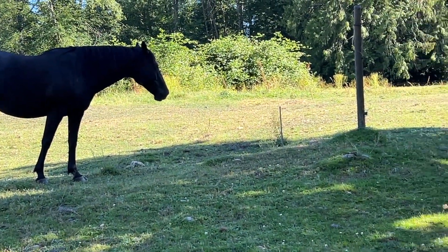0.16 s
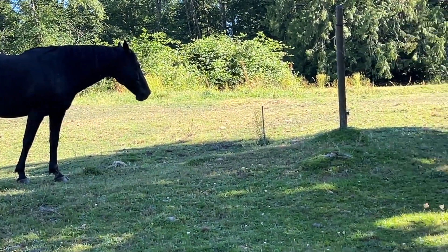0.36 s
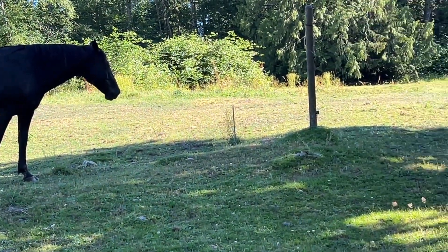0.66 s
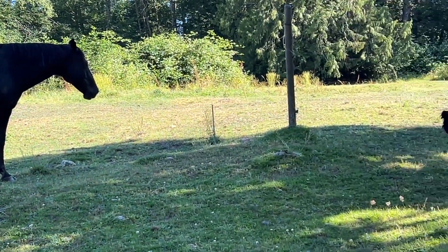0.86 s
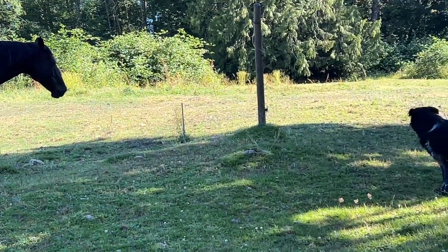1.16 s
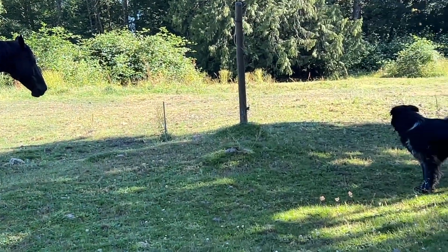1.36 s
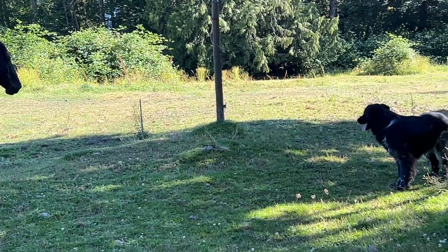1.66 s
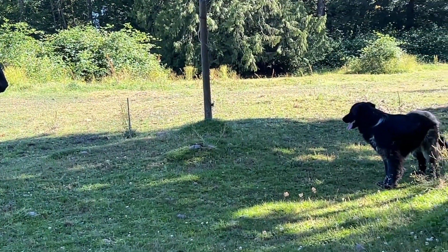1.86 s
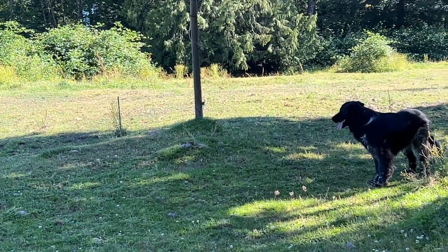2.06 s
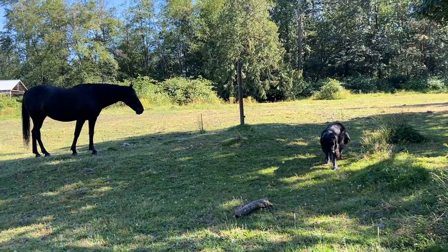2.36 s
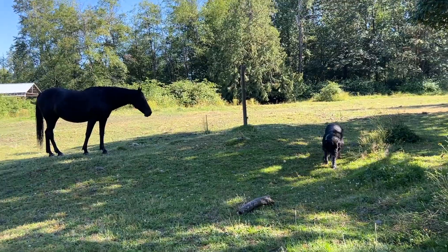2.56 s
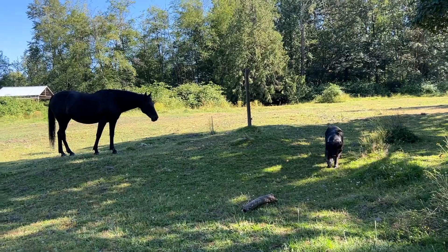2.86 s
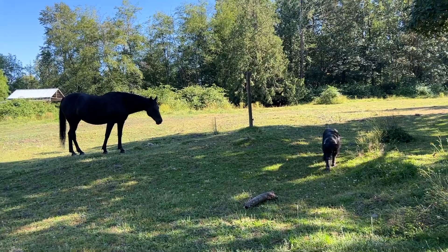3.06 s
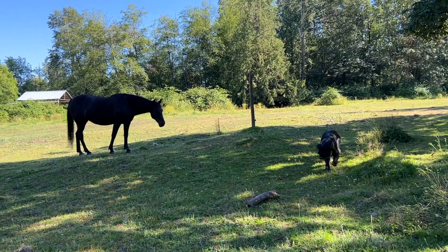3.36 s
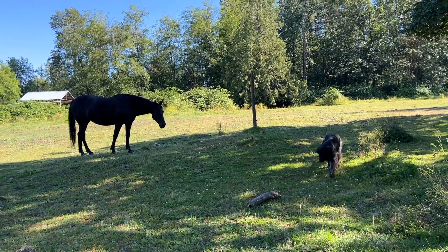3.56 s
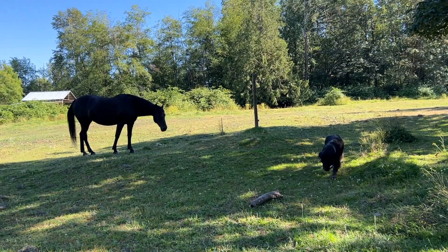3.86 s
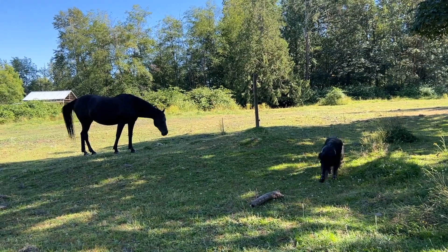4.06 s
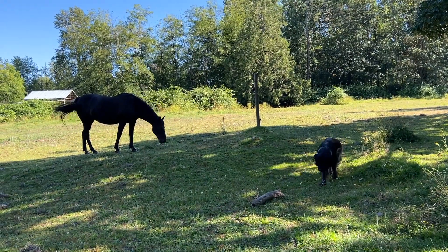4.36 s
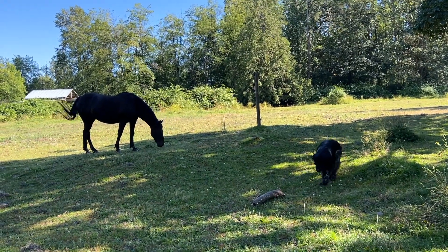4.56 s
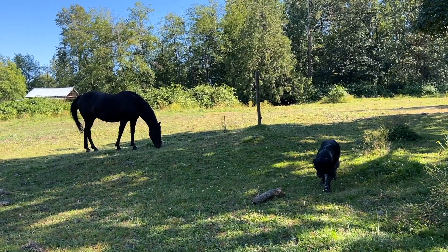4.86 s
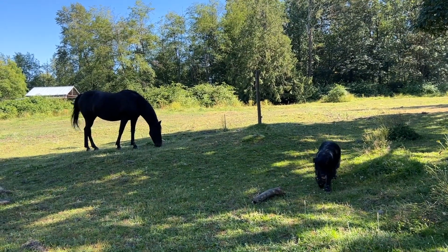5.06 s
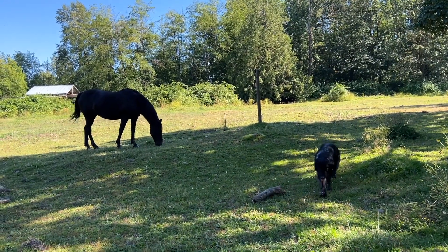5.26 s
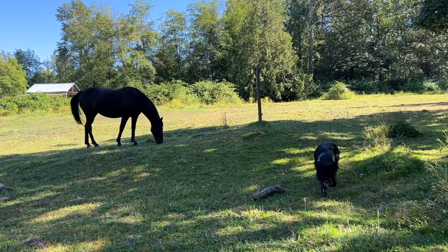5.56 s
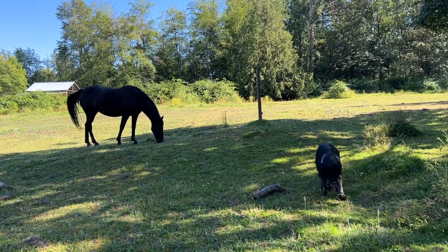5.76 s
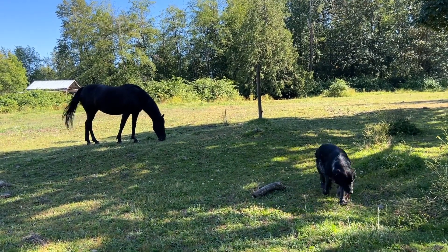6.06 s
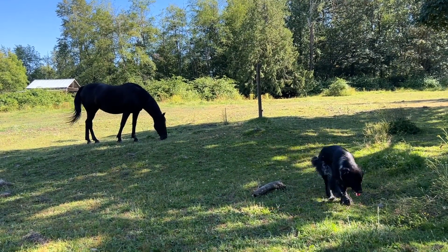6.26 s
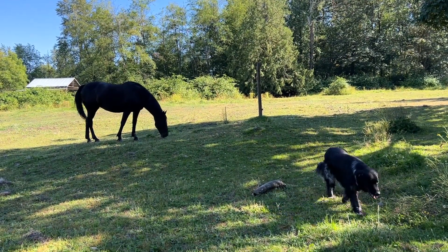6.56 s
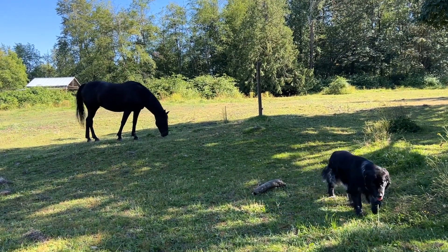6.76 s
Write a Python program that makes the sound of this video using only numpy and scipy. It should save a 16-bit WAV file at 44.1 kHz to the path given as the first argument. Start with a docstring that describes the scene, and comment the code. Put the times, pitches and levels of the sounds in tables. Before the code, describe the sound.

A horse gives one loud, fluttering snort after a stretch of low outdoor rumble, faint birds and one closer buzzy bird call.

```python
"""A summer pasture. Far traffic rumbles and leaves rustle, both as broadband noise. Birds call in
the tree line, which scatters their notes; a near one buzzes by modulating pitch and loudness together.
A dog's paws swish in the grass, among a few low thuds, a dry click and faint ticks.
At the end a horse blows through its nostrils, which flap open and shut about 24 times a second:
a fluttering valve that thumps and chops the air stream into whistle, breath and hiss."""
import sys
import numpy as np
from scipy import signal
from scipy.fft import rfft, irfft, next_fast_len
from scipy.io import wavfile
from scipy.ndimage import uniform_filter1d, map_coordinates

SR = 44100
rng = np.random.default_rng(int(sys.argv[2]) if len(sys.argv) > 2 else 0)


def output_pcm(signal):
    """Save a mono or channel-first signal as 16-bit PCM at the path in sys.argv[1].

    Samples are clipped to [-1, 1] before scaling.
    """
    pcm = np.clip(np.atleast_2d(signal).T, -1, 1) * 32767
    wavfile.write(sys.argv[1], SR, np.round(pcm).astype(np.int16))


N = 303849
CLICK_S = 2.3255

# Stereo coherence of the ambient noise: (frequency [Hz], left-right likeness [ratio])
AMBIENT_COHERENCE = [(60, 0.97), (180, 0.91), (550, 0.42), (1650, 0.3), (4970, 0.16), (8500, 0.2),
                     (9600, -0.96), (10600, -1.08), (11500, 0.14), (12700, 0.76), (14400, 0.88),
                     (15300, 0.11)]


def amp(db):
    """Decibels to amplitude ratio."""
    return 10 ** (np.asarray(db) / 20)


def unit(x):
    """Normalisation to an rms of 1."""
    return x / np.sqrt(np.mean(x ** 2) + 1e-20)


def along(points, hz):
    """Interpolation of (frequency [Hz], value) points on a log axis."""
    f, v = np.transpose(points)
    return np.interp(np.log(hz + 1), np.log(f + 1), v)


def passband(points):
    """Band-pass response through (frequency [Hz], gain [dB]) points, zero outside them."""
    return lambda hz: amp(along(points, hz)) * (hz > points[0][0]) * (hz < points[-1][0])


def curves(rows, at=None):
    """Linear envelopes, one for each column after the first."""
    s, *cols = np.transpose(rows)
    return [np.interp(np.arange(N) / SR if at is None else at, s, c) for c in cols]


def ramp(start_s, length_s):
    """Linear rise from 0 to 1."""
    return np.clip((np.arange(N) / SR - start_s) / length_s, 0, 1)


def wobble(rate, count=N):
    """Smooth random modulation with rate knots a second."""
    knots = rng.standard_normal(count // 16 + 4)[:int(count * rate / SR) + 4]
    return map_coordinates(knots, [np.arange(count) * rate / SR], order=2)


def phase(hz):
    """Phase in radians, the integral of frequency."""
    return 2 * np.pi * np.cumsum(hz) / SR


def hoarse(hz, width_hz):
    """Narrow-band noise: random quadrature modulation of a moving pitch."""
    angle = phase(hz)
    return wobble(width_hz, len(hz)) * np.cos(angle) + wobble(width_hz, len(hz)) * np.sin(angle)


def filtered(x, response):
    """Linear filtering by a complex frequency response."""
    m = next_fast_len(N + 8192, real=True)
    return irfft(rfft(x, m) * response(np.fft.rfftfreq(m, 1 / SR)), m)[..., :N]


def rush(gain, coherence, patchy_db):
    """Partly coherent stereo noise of rms 1, patchy in time and frequency."""
    spectra = signal.stft(rng.standard_normal((2, N)), nperseg=512)[2]
    patches = uniform_filter1d(uniform_filter1d(rng.standard_normal(spectra.shape[1:]), 6, 0), 14, 1)
    pair = signal.istft(spectra * amp(patchy_db * unit(patches)), nperseg=512)[1][:, :N]
    angle = lambda hz: np.arccos(np.clip(along(coherence, hz), -1, 1)) / 2
    mid, side = filtered(pair, lambda hz: gain(hz) * [np.cos(angle(hz)), np.sin(angle(hz))])
    return unit(np.array([mid + side, mid - side]))


def add(out, s, x):
    """Superposition of x on out from time s."""
    i = round(s * SR)
    x = x[..., max(-i, 0):max(N - i, 0)]
    out[..., max(i, 0):max(i, 0) + x.shape[-1]] += x


def pan(db):
    """Stereo gains for a left-minus-right level difference."""
    return amp(np.array([[.5], [-.5]]) * db)


def thump(first_hz, last_hz, fall_ms, swell_ms):
    """A damped oscillation whose pitch glides exponentially."""
    t = np.arange(SR // 5) / SR
    fall, age = fall_ms / 1000, t / swell_ms * 1000
    cycles = last_hz * t + (first_hz - last_hz) * fall * (1 - np.exp(-t / fall))
    return age * np.exp(1 - age) * np.sin(2 * np.pi * cycles)


def trees(x, t60, delay):
    """Scattering from the tree line: a diffuse decay, different on each side."""
    tail = rng.standard_normal((2, SR // 2)) * amp(-60 * np.arange(SR // 2) / SR / t60)
    delayed = np.pad(x, (int(delay * SR), 0))[None]
    return signal.oaconvolve(delayed, tail / np.linalg.norm(tail[0]), axes=1)[:, :N]


def traffic_and_leaves():
    """Amplitude-modulated noise bands: rumble, tyre roar of a far road, and leaves."""
    # Spectra: (frequency [Hz], gain [dB])
    rumble_band = [(22, -27), (40, -2), (60, 0.5), (95, -2.5), (130, -12), (170, -20), (260, -29.5)]
    road_band = [(120, 1.5), (200, -1.5), (311, -4), (468, -4.5), (640, -7.5), (930, 0), (1160, -9),
                 (1350, -8.5), (2060, -18), (3000, -22), (4000, -33.5)]
    leaf_band = [(1500, -3.5), (2500, -8), (3290, -4), (5000, -6), (7260, -10.5), (9000, -17), (11200, -18),
                 (13400, -18), (15000, -22), (15700, -29)]
    # Envelopes: (time [s], relative level [dB])
    rumble_levels = [(0, -45), (.3, -44), (.9, -42.5), (1.9, -46), (2.26, -41), (2.55, -48.5), (3.23, -47),
                     (3.7, -49), (4, -47), (4.45, -47.5), (5.35, -44.5), (5.7, -48), (6.05, -43),
                     (6.44, -47)]
    leaf_levels = [(0, -81), (1.5, -84), (2.6, -83.5), (3.3, -78), (4.4, -78), (5.4, -77), (6.44, -77.5)]
    (rumble_db,), (leaf_db,) = curves(rumble_levels), curves(leaf_levels)
    noise = lambda band, patchy_db: rush(passband(band), AMBIENT_COHERENCE, patchy_db)
    rumble = amp(rumble_db + 1.5 + 1.45 * wobble(7)) * noise(rumble_band, 1.06)
    road = amp(-54.5 + 1.11 * wobble(4.9)) * noise(road_band, 0.77)
    leaves = amp(leaf_db + 9 + 1.34 * wobble(7.3)) * noise(leaf_band, 1.95)
    return rumble + road + leaves


def far_birds():
    """Gliding notes, broadened by noise modulation and blurred by scattering."""
    # Single notes: (time [s], length [s], first pitch [Hz], last pitch [Hz], level [dB],
    # hoarseness [Hz], left minus right [dB])
    notes = [(-.05, 0.31, 4650, 4640, -72.5, 460, 5), (2.292, 0.035, 5200, 6000, -77, 200, -8),
             (2.345, .072, 7200, 6900, -80, 350, -3), (2.45, 0.22, 3280, 3330, -72, 170, -3),
             (2.755, 0.14, 6080, 6200, -77.5, 35, 9), (2.89, .2, 6170, 6010, -82, 35, 7),
             (3.221, 0.67, 6900, 6870, -82, 251, -3), (3.754, 0.074, 4030, 4130, -67, 70, 8),
             (3.755, .055, 4560, 4610, -67, 30, 7), (3.752, 0.14, 4300, 4540, -62.5, 35, 8),
             (3.85, 0.16, 4470, 4720, -70, 50, 4), (3.9, 0.32, 4500, 4530, -75.5, 149.6, 4),
             (4.12, 0.15, 1640, 1496, -64, 148.4, -2)]
    # Repeated notes: (start [s], end [s], period [s], loudest note [index], fade away from it
    # [dB per note], then the columns above from length on)
    series = [(0.274, .44, 0.013, 4.5, 1.8, 0.018, 2950, 3680, -66, 60, 3),
              (0.516, 1.3, 0.1465, 0.5, 2.8, .085, 4360, 3790, -68, 151, 0.5),
              (3.108, 3.68, .091, 4.5, .7, .024, 4040, 4470, -70, 35, 5.7)]
    repeats = [(s, length, first_hz, last_hz, db - fade_db * abs(k - loudest), *rest)
               for start, end, period, loudest, fade_db, length, first_hz, last_hz, db, *rest in series
               for k, s in enumerate(np.arange(start, end, period))]
    out = np.zeros((2, N))
    for s, length, first_hz, last_hz, db, hoarse_hz, pan_db in notes + repeats:
        t = np.arange(SR // 5 * int(np.ceil(length * 5))) / SR
        hz = np.interp(t, [0, length], [first_hz, last_hz])
        envelope = np.interp(t / length, [0, 0.092, 0.75, 1], [0, 1, 1, 0])
        pure = np.exp(-hoarse_hz / 50)  # share of plain whistle
        note = [(1 - pure) * hoarse(hz, 2.8 * hoarse_hz) + pure * np.sin(phase(hz)) for side in range(2)]
        add(out, s, amp(db) * pan(pan_db) * envelope * note)
    return out + amp(-2) * trees(out[0], t60=0.38, delay=.02)


def ticks():
    """Faint transients: band noise under a half-sine envelope."""
    # (time [s], length [s], centre frequency [Hz], level [dB])
    puffs = [(0.036, 0.01, 955, -56), (3.5, .04, 7600, -76), (4.746, 0.024, 2190, -65),
             (5.016, 0.059, 2004, -62), (5.291, 0.07, 1734, -62), (5.585, .034, 1974, -64),
             (5.85, 0.022, 2450, -64), (6.153, 0.013, 4320, -64.5)]
    out, t = np.zeros(N), np.arange(SR // 5) / SR
    for s, length, hz, db in puffs:
        envelope = np.sin(np.pi * np.clip(t / length, 0, 1))
        add(out, s, amp(db) * envelope * hoarse(np.full_like(t, hz), width_hz=.45 * hz))
    return out


def paws_in_grass():
    """Friction noise: each swish of a paw is a burst of crackling blades."""
    # (time [s], length [s], level [dB], dull band over bright band [dB])
    swishes = [(0.284, 0.061, -84, 10), (1.007, 0.098, -77, 3), (3.004, .06, -80, -6), (3.44, .1, -85, 1),
               (3.615, .08, -77.5, -13), (3.98, .07, -80, -10), (4.49, .1, -81, 0), (4.674, .08, -85.5, 9),
               (5.273, 0.1, -74.5, -3), (5.856, 0.11, -82, -4), (6.023, 0.11, -81, 6),
               (6.15, 0.017, -76, -3), (6.28, 0.062, -79.5, 0), (6.353, 0.016, -76, 3)]
    # Spectra: (frequency [Hz], gain [dB])
    bright_band = [(8300, -20), (9500, -2), (11300, 2), (14500, -11), (15800, -3)]
    dull_band = [(1500, -26), (3000, -4), (7500, -2.5), (9000, -7), (10200, -22)]
    bright, dull = np.zeros(N), np.zeros(N)
    for s, length, db, dull_db in swishes:
        envelope = signal.windows.tukey(int(length * SR), .6)
        add(bright, s, amp(db) * envelope)
        add(dull, s, amp(db + dull_db) * envelope)
    crackle = amp(3.2 * wobble(250))
    bright = bright * rush(passband(bright_band), AMBIENT_COHERENCE, patchy_db=4)
    dull = dull * rush(passband(dull_band), AMBIENT_COHERENCE, patchy_db=-0.5)
    return crackle * (bright + dull)


def thuds():
    """Damped low oscillations; one is cut off abruptly, with a dry click."""
    # (time [s], peak level [dB], first pitch [Hz], last pitch [Hz], glide [ms], swell [ms])
    bumps = [(1.946, -36, 54.3, 84.5, 22, 16), (2.116, -29.5, 162, 48.3, 20.7, 17),
             (2.303, -29.5, 104, 79, 17, 6.7), (6.12, -28, 130, 60, 9.5, 7.1)]
    out = np.zeros(N)
    for s, db, *shape in bumps:
        cut = round((CLICK_S - s) * SR) if s < CLICK_S else None
        add(out, s, amp(db) * thump(*shape)[:cut])
    add(out, CLICK_S - .003, amp(-29.5) * np.linspace(0, 1, round(0.0042 * SR)))
    return filtered(out, lambda hz: 1 / (1 + (hz / 11000) ** 6))


def near_bird():
    """Frequency and amplitude modulation at one rate give each overlapping voice its buzz."""
    # Voice contours: (time [s], pitch [Hz], relative level [dB])
    upper = [(5.03, 3300, -71), (5.043, 3505, -60), (5.056, 3900, -50), (5.075, 4015, -47.5),
             (5.15, 4055, -48.5), (5.2, 3993, -48), (5.225, 3930, -48.5), (5.275, 3900, -52.5),
             (5.3, 3820, -54), (5.33, 3815, -55), (5.355, 3880, -75)]
    middle = [(5.195, 4260, -77), (5.225, 4230, -57), (5.274, 4190, -57), (5.3, 4100, -55),
              (5.349, 3936, -55.5), (5.4, 3800, -56.5), (5.425, 3790, -78)]
    lower = [(5.28, 3556, -75), (5.33, 3580, -63), (5.41, 3456, -57.5), (5.45, 3550, -56),
             (5.46, 3600, -80)]
    ending = [(5.452, 3850, -75), (5.465, 3820, -53), (5.495, 3720, -70), (5.524, 3610, -64),
              (5.575, 3580, -57.5), (5.597, 3420, -60), (5.61, 3350, -93)]
    # Modulation of each voice: (rate [Hz], pitch swing [Hz], amplitude depth [0-1])
    buzzes = [(153, 120, 0.6), (130, 70, 0.4), (130, 93, 0.3), (100, 22, 0.17)]
    song, t = 0, np.arange(N) / SR
    for voice, (buzz_hz, swing_hz, depth) in zip((upper, middle, lower, ending), buzzes):
        hz, db = curves(voice)
        beat = phase(buzz_hz * (1 + 0.0605 * wobble(50)))
        skewed_swing = np.sin(beat) - 0.32 * np.cos(2 * beat)
        pitch = hz + swing_hz * skewed_swing + 22 * wobble(150)
        envelope = amp(db + 3 + 1.2 * wobble(45)) * (t > voice[0][0]) * (t < voice[-1][0])
        song = song + envelope * (1 + depth * np.cos(beat - 1.1)) * np.sin(phase(pitch))
    return song * pan(-3.6) + amp(-10) * trees(song, t60=0.52, delay=0.022)


def resonance(hz, centre, width):
    """Band-pass response of a damped resonator."""
    return 1j * hz * width / (centre ** 2 - hz ** 2 + 1j * hz * width)


def nasal_passage(hz):
    """Modal response of the nose: formants summed with alternating sign."""
    # (frequency [Hz], bandwidth [Hz], gain [dB])
    formants = [(320, 210, 7.5), (480, 430, 4.5), (1375, 175, 5), (1580, 430, -1.5), (2308, 130, -4),
                (3070, 150, -6.5)]
    return sum((-1) ** k * amp(db) * resonance(hz, centre, width)
               for k, (centre, width, db) in enumerate(formants))


def nostril_flaps(cycles, flap_db, slap_db, tautness):
    """Impulse excitation: each opening thumps three times, and its slap rings the nasal passage."""
    # Thumps at full tautness: (delay [ms], relative level [dB], first pitch [Hz], last pitch [Hz],
    # glide [ms], swell [ms])
    flaps = [(4.7, 0, 240, 220, 6, 3.5), (14.1, 0, 240, 55, 12, 4.3), (25.5, -7, 85, 62, 9.7, 7.5)]
    thumps, slaps = np.zeros(N), np.zeros(N)
    openings = np.flatnonzero(np.diff(np.floor(cycles)) > 0)[::-1]
    for i, scatter in zip(openings[:11], rng.standard_normal((11, 3, 3))):
        s, taut = i / SR, tautness[i]
        add(slaps, s + .001, amp([slap_db[i] + 1.5 * scatter[0, 0]]))
        for (ms, db, first_hz, last_hz, fall_ms, swell_ms), (late, strong, tune) in zip(flaps, scatter):
            start_hz = taut * first_hz * (1 + 0.011 * tune)
            knock = thump(start_hz, np.sqrt(taut) * last_hz, fall_ms / taut, swell_ms / taut)
            add(thumps, s + ms / 1000 + .0002 * late, amp(flap_db[i] + db + .8 * strong) * knock)
    ring = lambda f: (0.49 * nasal_passage(f) + 1.5 * resonance(f, 900, 200)) / (1 + 1j * f / 1300) ** 2
    return filtered(thumps, lambda f: 1 / (1 + (50 / (f + 1)) ** 4)), amp(5) * filtered(slaps, ring)


def nostril_whistle(cycles):
    """A hoarse flow tone that climbs as the gap widens, starting just before each opening."""
    hz = np.interp((cycles - .68) % 1, [0, .42], [747.5, 949])
    tone, spread = (hoarse(hz, width_hz=350) for _ in range(2))
    tone = tone + 0.65 * np.sin(phase(hz + 40 * wobble(90)))
    return unit(np.array([tone + 0.23 * spread, tone - 0.2 * spread]))


def air_stream(cycles, leak_db, hiss_trim_db):
    """Valve modulation: the nostrils chop a whistle, resonant breath and the hiss of a turbulent jet."""
    # One cycle, open then shut: (position [0-1], relative whistle level [dB], relative breath level [dB])
    valve_cycle = [(0, -29, -37), (.1, -27, -35.5), (.17, -37, -35), (.28, -40, -39), (.36, -31, -34.5),
                   (.41, -45, -45), (.68, -45, -47.5), (.76, -35.5, -46.5), (.93, -33, -43),
                   (1, -27.5, -48)]
    # Jet spectrum: (frequency [Hz], gain [dB])
    jet_band = [(1800, -5.5), (3500, -5), (4150, -8.5), (4450, 0.5), (5800, -6.5), (7000, -2.5), (8200, -6),
                (10000, -9.5), (11400, -6.5), (14300, -14), (15800, -20)]
    # (frequency [Hz], left-right likeness [ratio])
    jet_coherence = [(300, 1), (700, 1), (1400, 0.85), (8000, 0.59), (10000, 1), (12500, 0.84)]
    position, depth = cycles % 1, ramp(6.46, 0.12)
    pulse = lambda at, width: np.exp(-((position - at) / width) ** 2)
    whistle_db, breath_db = curves(valve_cycle, at=position)
    whistle_db += leak_db * pulse(0.8, 0.089)  # air leaks ahead of the opening
    hiss_db = -39 + hiss_trim_db + 1.08 * (breath_db - breath_db.max())
    hiss_db += 1.34 * wobble(350) + 10.5 * pulse(0.734, 0.022)  # wet grain, and a spit while shut

    def chopped(db, onset_db):
        """Gain that holds onset_db above its mean level until the flutter deepens."""
        return amp(depth * db + (1 - depth) * (np.mean(db) + onset_db))

    whistle = chopped(whistle_db, 8) * nostril_whistle(cycles)
    breath = chopped(breath_db, 7) * rush(lambda f: abs(nasal_passage(f)), jet_coherence, patchy_db=2.5)
    hiss = chopped(hiss_db, 2.5) * rush(passband(jet_band), jet_coherence, patchy_db=1)
    return amp(-3.5) * whistle + amp(2) * (breath + hiss)


def horse_blow():
    """Flow-induced flutter: the nostrils thump and chop a swelling air stream over a low rumble."""
    # (time [s], flutter rate [Hz], flap level [dB], slap level [dB], tautness [0-1], leak [dB],
    # hiss trim [dB])
    gesture = [(6.46, 22, -49, -11, .45, 2, 0), (6.505, 20.5, -21.5, 0, .43, 8, -2.5),
               (6.555, 22.3, -25, 5, 0.77, 8, -3), (6.6, 24, -24.5, 8.5, 0.96, -1, 0.5),
               (6.64, 23.8, -21.5, 8, 1, 14, 0), (6.68, 23.6, -23.5, -2, 1, 2, 0),
               (6.72, 23.7, -19.5, -2, 1, 7, 1), (6.77, 23.8, -18, 10, 1, 1, -0.5),
               (6.84, 24.2, -23.5, 4, 0.89, -2, 0.5), (6.9, 24, -15, -2, 1, -3, 1.5)]
    # Direction cues: (frequency [Hz], left phase lead [rad]) and (frequency [Hz], left minus right [dB])
    phase_lead = [(250, -0.6), (520, 1.2), (690, -0.6), (1070, 1.3), (1360, 0.2), (1800, 1.3), (2300, 0.5),
                  (3100, 1.3), (4300, 1.5), (5500, 4), (6800, 6), (9000, 4.5), (10000, 2.5), (11300, 2.1),
                  (12600, 1.5), (15500, -1.5)]
    level_difference = [(60, -2), (92, -0.5), (140, 1), (210, 0), (330, -1), (500, 1.0), (770, 1.5),
                        (1170, 0.5), (1790, 1.5), (2740, -0.5), (4190, 0), (6410, 7.5), (9810, -0.5),
                        (15000, 0.5)]
    start_s, opening_s = 6.43, 6.764  # the air starts; one moment at which the nostrils fly open
    t = np.arange(N) / SR
    blowing = t > start_s
    rate, flap_db, slap_db, tautness, leak_db, hiss_trim_db = curves(gesture)
    cycles = np.cumsum(rate) / SR
    cycles -= cycles[round(opening_s * SR)]
    thumps, slaps = nostril_flaps(cycles, flap_db, slap_db, tautness)
    swell_db = (t - opening_s) - 35 * (1 - ramp(start_s, 0.09)) ** 1.74  # fast rise, then 1 dB a second
    air = amp(swell_db) * blowing * air_stream(cycles, leak_db, hiss_trim_db) + slaps
    lead = lambda f: np.exp(np.array([[.5j], [-.5j]]) * along(phase_lead, f))
    air = filtered(air, lambda f: lead(f) * pan(along(level_difference, f)))
    rumble = unit(filtered(rng.standard_normal(N), passband([(55, -4), (85, 9), (125, 1), (170, -34)])))
    body = thumps + amp(flap_db - 15.5) * blowing * rumble
    return body * pan(-.5) + air + amp(-19) * trees(air[0] + body, t60=0.4, delay=0.013)


def scene():
    """Superposition of all sources."""
    return (horse_blow() + near_bird() + far_birds() + thuds() + paws_in_grass() + ticks()
            + traffic_and_leaves())


def record(dry):
    """Mid-side filtering narrows the treble image until the click; a low-pass limits the band."""
    # Side-signal response: (frequency [Hz], gain [dB])
    narrowing = [(1800, -2), (2400, -19.5), (4500, -21), (8100, -32), (8400, 1)]
    mid, side = (dry[0] + dry[1]) / 2, (dry[0] - dry[1]) / 2
    early = np.arange(N) < CLICK_S * SR
    side = np.where(early, filtered(side, lambda hz: amp(along(narrowing, hz))), side)
    return filtered(np.array([mid + side, mid - side]), lambda hz: hz < 15790)


dry = scene()
out = record(dry)
output_pcm(out)
```